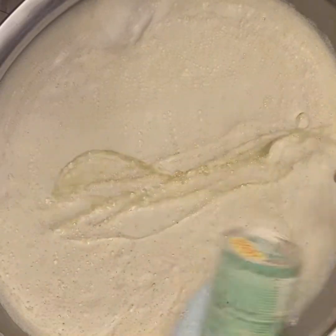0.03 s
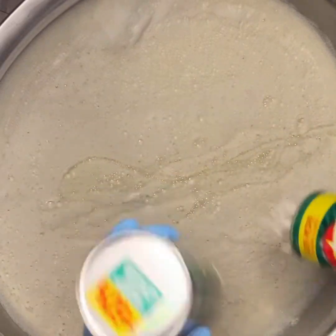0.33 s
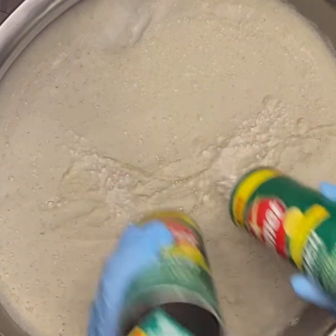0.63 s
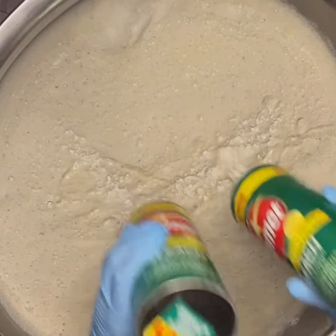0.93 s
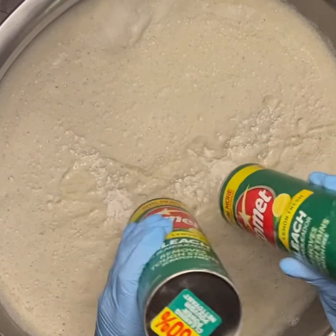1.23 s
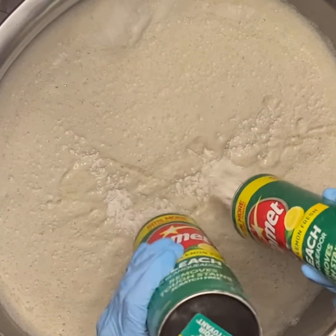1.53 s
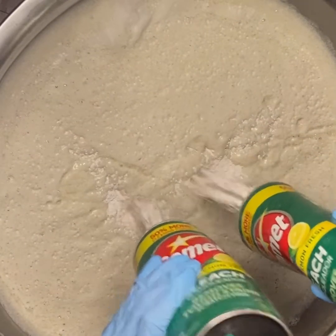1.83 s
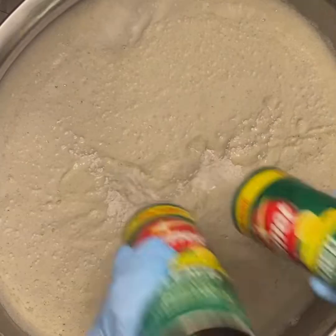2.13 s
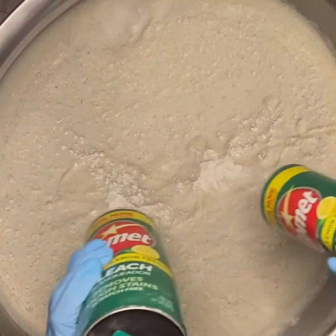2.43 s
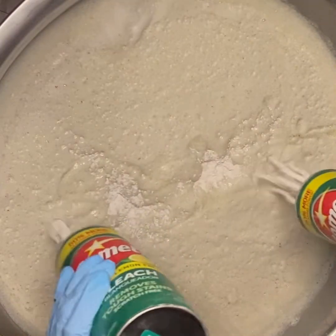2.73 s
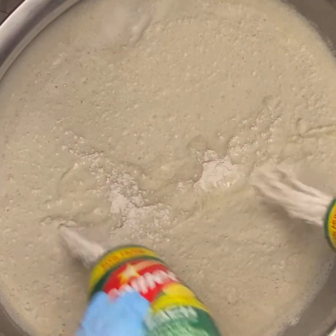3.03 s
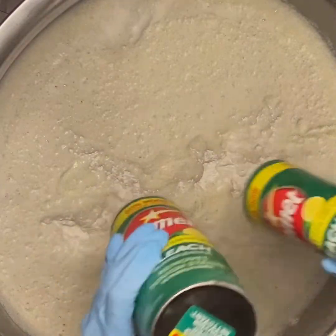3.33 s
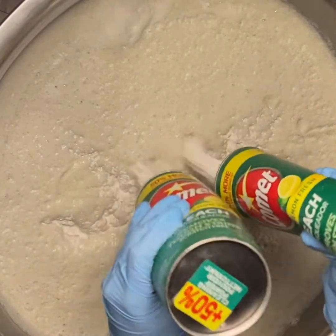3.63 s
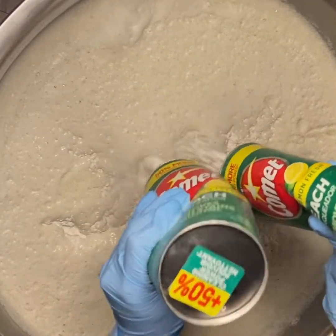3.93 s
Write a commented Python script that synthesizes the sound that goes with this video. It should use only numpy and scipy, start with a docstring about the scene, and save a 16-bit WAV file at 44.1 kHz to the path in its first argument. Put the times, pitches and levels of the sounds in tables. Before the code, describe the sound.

Foam fizzes and hisses as powder is shaken on, with a few canister clicks.

```python
"""Scouring powder pours from two canisters onto foam in a steel basin, hissing and fizzing close by.
Countless tiny bubbles and grains add up to broadband noise; small lumps excite the basin's resonances
and larger clumps land with a soft rush. Impacts set the canisters into damped free vibration: one hard
clack, sharp ticks of the rims and hollow taps on the cardboard tubes.
A machine rumbles and hums underneath, and a small, hard room adds brief reverberation."""
import sys
import numpy as np
from scipy import signal
from scipy.fft import rfft, irfft
from scipy.io import wavfile
from scipy.ndimage import uniform_filter1d

SR = 44100
rng = np.random.default_rng(int(sys.argv[2]) if len(sys.argv) > 2 else 0)


def generate_wav(sig):
    """Save sig (samples, or channels by samples) to the path in sys.argv[1] as 16-bit PCM at SR."""
    pcm = np.round(np.clip(np.atleast_2d(sig).T, -1, 1) * 32767).astype(np.int16)
    wavfile.write(sys.argv[1], SR, pcm)


N = 176400
T = np.arange(N) / SR

# Hiss levels over time: the pour, with a brief duck after the clack.
# Each row: time in seconds, relative levels of low, middle and treble hiss in dB.
HISS_LEVELS = [(0.0,-62,-59,-59.5),(0.19,-59,-65.5,-72),(0.27,-60,-53.5,-62),(0.312,-56,-57,-62),(0.37,-50.5,-59,-54),(0.5,-53.5,-51,-54),(0.92,-53,-51.5,-56.5),(1.14,-56.5,-55.5,-57),(1.36,-58,-53.5,-55.5),(1.55,-51,-52,-57.5),(1.85,-52,-52,-58.5),(2.08,-53,-52,-56.5),(2.27,-59,-52.5,-58),(2.46,-53.5,-50,-58),(2.7,-49,-47.5,-55.5),(3.1,-45,-47,-53),(3.42,-54,-48.5,-57.5),(3.6,-48,-49,-57),(3.78,-51,-48.5,-54.5),(4.0,-47,-51,-58.5)]
# Spectra of the three hiss bands. Each row: frequency in Hz, relative level in dB.
LOW_HISS_SPECTRUM = [(250, -12), (550, 4), (800, -1.5), (1100, -2), (1750, -4), (2600, -7), (4500, -39)]
MIDDLE_HISS_SPECTRUM = [(900, -25), (1700, -6), (2400, 1), (3500, 0), (5400, 0), (7000, -1), (8500, -2),
                        (10500, -10), (13000, -30)]
TREBLE_HISS_SPECTRUM = [(4500, -20), (7000, -3), (8200, 1.5), (9500, 1), (10800, -.5), (12000, -3.5),
                        (13500, -7), (15000, -11), (15700, -14), (16500, -28)]
# Resonances of the basin's hollow. Each row: frequency in Hz, bandwidth in Hz, relative level in dB.
BASIN_RESONANCES = [(171, 43, 8), (430, 77, 4.5), (620, 130, 0), (790, 76, 0), (1440, 180, -8),
                    (2170, 230, -4.5), (2700, 250, -5.5)]
# Two filters in series that shape the rumble. Each row: frequency in Hz, relative gain in dB.
RUMBLE_SPECTRUM = [(12, -30), (20, -11.5), (48, -2.5), (70, 4), (124, -4.5), (147, -9), (189, -5.5),
                   (252, -11.5), (290, -11.5), (330, -16.5), (392, -6.5), (478, -20), (600, -19),
                   (780, -39.5), (1320, -120)]
RUMBLE_SLOPE = [(20, -1), (60, -2), (550, -3.5), (900, 6.5), (1500, -28), (4000, -63)]
# Partials of the machine's hum. Each row: frequency in Hz, rms level in dB.
HUM_PARTIALS = [(59.5, -52), (75, -51.5), (119, -52), (197, -55.5), (294, -56.5), (389, -61.5)]
# Modes of a canister struck hard and of its tube tapped softly.
# Each row: frequency in Hz, relative level in dB, time to decay by 60 dB in seconds.
CANISTER_MODES = [(407, -37, 0.12), (805, -26, 0.03), (1295, -42, 0.028), (1630, -43, 0.0069),
                  (2270, -39, 0.022), (2488, -19, 0.027), (3450, -23.5, 0.0097), (4150, -28.5, 0.012),
                  (5400, -17.5, 0.011), (5520, -7.5, 0.0047), (7500, -11, 0.0063), (8700, -16.5, 0.0088),
                  (10860, -27, 0.0083)]
TUBE_MODES = [(800, -26.5, 0.024), (1195, -22, 0.013), (1440, -22.5, 0.0076), (1950, -22, 0.006),
              (2500, -13, 0.0056)]
# Spectra of the clack's contact and the powder inside. Each row: frequency in Hz, relative level in dB.
CRACK_SPECTRUM = [(200, -18), (700, -4), (1000, -15), (1400, 6), (1850, -11), (2500, -1), (4600, -3),
                  (5800, 3.5), (8500, 2), (12000, -14), (16000, -20)]
RATTLE_SPECTRUM = [(400, -6), (1500, -3), (2400, 3), (4500, 5.5), (8000, 6), (11000, 0), (13500, -21),
                   (16000, -36)]
# Rim impacts. Each row: start in seconds, gain in dB, ring frequency in Hz, body re click in dB.
RIM_TICKS = [(0.056, -12, 9400, -22), (1.2447, -28, 11000, -12), (1.2818, -21, 8000, -2),
             (1.2848, -9, 7600, 5.5), (1.289, -14, 12300, -23), (1.3531, -23.5, 11500, -20),
             (1.4074, -15.5, 10200, -20), (1.4157, -19.5, 6800, -20), (1.4487, -24, 12000, -20),
             (1.4906, -15.5, 9100, -19), (1.6603, 11.5, 10620, -23), (3.8561, -14.5, 10500, 4.5)]
# Spectra of a tick's click and the duller body under it. Each row: frequency in Hz, relative level in dB.
CLICK_SPECTRUM = [(200, -33), (1000, -23), (2500, -6.5), (3800, -5), (5100, 1), (6500, -6.5), (7800, 0),
                  (9000, -2.5), (10700, -5), (12200, -7), (13200, -16.5), (14500, -6), (16000, -29.5)]
BODY_SPECTRUM = [(300, -9), (900, -12), (1300, 0), (1800, -1), (2700, 6), (4500, 11), (7000, -20),
                 (14000, -44)]
# Taps on the tubes. Each row: start in seconds, gain in dB, cutoff of the contact in Hz.
TUBE_TAPS = [(0.0787, -2, 3200), (0.0828, -19, 895), (3.8565, 0, 1290)]
# Clumps landing. Each row: start in seconds, gain in dB, decay time constant in seconds, cutoff in Hz.
CLUMP_LANDINGS = [(0.318, -38.5, 0.076, 11000), (0.359, -40.5, 0.055, 7000), (0.805, -28.5, 0.0054, 4000),
                  (1.036, -35, 0.025, 8000), (1.769, -40.5, 0.65, 1810), (2.132, -32.5, 0.03, 2000),
                  (3.586, -32.5, 0.068, 1500), (3.89, -38.5, 0.091, 2480)]
# Spectrum of a clump's rush. Each row: frequency in Hz, relative level in dB.
CLUMP_SPECTRUM = [(300, 1.5), (900, -2.5), (2500, 3.5), (5500, 1.5), (8000, 4), (11000, 1), (14000, -1),
                  (16000, -30)]
# Filter for the stereo side signal. Each row: frequency in Hz, gain in dB.
SIDE_RESPONSE = [(30, -72), (100, -32), (350, -17), (700, -7.5), (1300, -6.5), (2400, -20.5), (5000, -13),
                 (8000, -74), (10000, -19), (15000, -20)]
# Phase lag of the left channel. Each row: frequency in Hz, lag in radians.
LEFT_PHASE_LAG = [(0, 0), (4900, .15), (5340, 1.0), (5860, 1.6), (6400, 2.1), (6900, 2.55), (7450, 3.08),
                  (8550, 3.2), (9100, 3.8), (10000, 4.4), (11000, 5.1), (11900, 6.1), (14200, 6.3),
                  (14700, 6.8), (15600, 9.1)]


def undb(db):
    """Amplitude ratio for a level in decibels."""
    return 10 ** (np.asarray(db) / 20)


def unit(x):
    """Normalisation to an rms of 1."""
    return x / np.sqrt(np.mean(x ** 2))


def noise():
    """Independent Gaussian samples have a white spectrum."""
    return rng.standard_normal(N)


def colour(x, points, keep_power=False, size=8192):
    """A minimum-phase filter through (Hz, dB) points, made causal by folding the cepstrum."""
    hz, db = np.array(points, float).T
    bins_hz = np.maximum(np.fft.rfftfreq(size, 1 / SR), 1)
    gain = undb(np.interp(np.log(bins_hz), np.log(hz), db))
    cepstrum = irfft(np.log(unit(gain) if keep_power else gain))
    cepstrum[1:size // 2] *= 2
    cepstrum[size // 2 + 1:] = 0
    response = irfft(np.exp(rfft(cepstrum)))[:size // 2]
    return signal.oaconvolve(x, response)[:N]


def wander(rate_hz):
    """Random steps, averaged twice, give a smooth fluctuation with an rms of 1."""
    hold = int(SR / rate_hz)
    steps = noise()[np.arange(N) // hold]
    return unit(uniform_filter1d(uniform_filter1d(steps, hold), hold))


def add(out, start_s, x):
    """Superposition of a sound from a given time onward."""
    i = int(start_s * SR)
    out[i:i + len(x)] += x[:N - i]


def random_impulses(per_s, cap_db, spread_db=4.5):
    """A Poisson process: independent events, here with exponentially distributed levels in dB."""
    occurs = rng.random(N) < per_s / SR
    return occurs * undb(np.minimum(spread_db * rng.exponential(size=N), cap_db))


def fizz(pop_power_share=.21, flicker_db=.4):
    """Shot noise from tiny bubbles and grains joins a smooth hiss in three bands of varying level."""
    times, low_db, middle_db, treble_db = np.array(HISS_LEVELS).T
    bands = [(LOW_HISS_SPECTRUM, low_db), (MIDDLE_HISS_SPECTRUM, middle_db + 3.5),
             (TREBLE_HISS_SPECTRUM, treble_db + 5)]
    pops, out = unit(random_impulses(per_s=5000, cap_db=27)), np.zeros(N)
    for spectrum, band_db in bands:
        grains = np.sqrt(pop_power_share) * pops * np.sign(noise())
        hiss = np.sqrt(1 - pop_power_share) * noise()
        level_db = np.interp(T, times, band_db) + flicker_db * wander(25.08)
        out += unit(colour(grains + hiss, spectrum)) * undb(level_db)
    return out


def lump_patter(grain_decay_s=.003):
    """Small lumps fall at random on the foam and drive the basin's hollow into resonance."""
    times, low_db, _, _ = np.array(HISS_LEVELS).T
    lumps = random_impulses(per_s=110, cap_db=13.5)
    patter = noise() * signal.lfilter([1], [1, -np.exp(-1 / (grain_decay_s * SR))], lumps)
    hollow = sum(undb(db) * signal.lfilter(*signal.iirpeak(hz, hz / bandwidth, fs=SR), patter)
                 for hz, bandwidth, db in BASIN_RESONANCES)
    return unit(hollow) * undb(np.interp(T, times, low_db) - .5)


def machine(rise_db_per_s=1.07, waver_db=2, relative_drift=.0079):
    """A continuous spectrum, the slowly swelling rumble, lies under a line spectrum, the wavering hum."""
    rumble = unit(colour(colour(noise(), RUMBLE_SPECTRUM), RUMBLE_SLOPE))
    out = rumble * undb(-40 + rise_db_per_s * T)
    for hz, db in HUM_PARTIALS:
        amplitude = np.sqrt(2) * undb(db) * unit(undb(waver_db * wander(8)))
        frequency = hz * (1 + relative_drift * wander(10))
        out += amplitude * np.sin(2 * np.pi * np.cumsum(frequency) / SR)
    return out


def strike(modes, contact_hz, t):
    """An impact excites damped modes; the contact acts as a low-pass filter, duller when softer."""
    ring = sum(undb(db) * np.sin(2 * np.pi * hz * t) * undb(-60 * t / t60) for hz, db, t60 in modes)
    return signal.lfilter(*signal.butter(2, contact_hz, fs=SR), ring)


def canister_clack(start_s=.0477, gain_db=3):
    """A hard impact is broadband: it cracks, rings the canister's modes and rattles the powder inside."""
    t, out = T[:SR // 2], np.zeros(N)

    def burst(spectrum, db, decay_s):
        decaying = rng.standard_normal(len(t)) * np.exp(-t / decay_s)
        return undb(db) * colour(decaying, spectrum, keep_power=True)[:len(t)]
    crack = burst(CRACK_SPECTRUM, db=-14.5, decay_s=.0028)
    rattle = burst(RATTLE_SPECTRUM, db=-32, decay_s=.035)
    ring = strike(CANISTER_MODES, contact_hz=9500, t=t)
    add(out, start_s, undb(gain_db) * (ring + crack + rattle))
    return out


def rim_ticks(echo_s=.00112, echo_gain=.26, ring_q=3.07, ring_db=10.5):
    """Each click excites a damped rim resonance; reflection between close, hard walls repeats it."""
    echoes, out = np.zeros(SR // 10), np.zeros(N)
    for bounce in range(4):
        echoes[int(bounce * echo_s * SR)] = echo_gain ** bounce
    click = colour(echoes, CLICK_SPECTRUM, keep_power=True)
    body = colour(echoes, BODY_SPECTRUM, keep_power=True)
    for start, db, ring_hz, body_db in RIM_TICKS:
        contact = (click + undb(body_db) * body) / 2
        rim = signal.lfilter(*signal.iirpeak(ring_hz, ring_q, fs=SR), click)
        add(out, start, undb(db) * (contact + undb(ring_db) * rim))
    return out


def tube_taps():
    """Softer impacts set a hollow cardboard tube into heavily damped free vibration."""
    out = np.zeros(N)
    for start, db, contact_hz in TUBE_TAPS:
        add(out, start, undb(db) * strike(TUBE_MODES, contact_hz, T[:SR // 2]))
    return out


def clump_puffs(attack_s=.0015):
    """Each clump of powder lands as a noise transient with a fast rise and an exponential decay."""
    rush, out = unit(colour(noise(), CLUMP_SPECTRUM)), np.zeros(N)
    for start, db, decay_s, cutoff_hz in CLUMP_LANDINGS:
        dulled = signal.lfilter(*signal.butter(1, cutoff_hz, fs=SR), rush)
        age = np.maximum(T - start, 0)
        envelope = (1 - np.exp(-age / attack_s)) * np.exp(-age / decay_s)
        out += undb(db) * envelope * dulled
    return out


def reverberation(x, scatter_decay_s=.0015, t60_s=.19):
    """Dense reflections merge into decaying noise: early scatter in the basin, then the room's tail."""
    def reflections(envelope):
        return unit(noise() * envelope) / np.sqrt(N)  # unit energy
    decay = undb(-60 * T / t60_s)
    dull_tail = colour(reflections(decay), [(2800, .5), (5000, -11.5), (9000, -22.5), (15000, -35)])
    bright_tail = colour(reflections(decay),
                         [(2000, -3), (5000, -8), (8000, 8.5), (10000, -11), (12000, -10), (15000, -18)])
    scatter = reflections(np.exp(-T / scatter_decay_s))
    response = undb(-8.5) * (dull_tail + bright_tail) + undb(-11) * scatter
    return signal.fftconvolve(x, response)[:N]


def scene():
    """The sources superpose at the centre; uncorrelated fizz, machine noise and reflections add width."""
    knocks, ticks = canister_clack() + tube_taps(), rim_ticks()
    powder = fizz() + clump_puffs() + lump_patter()
    into_room = undb(.5) * knocks + undb(-1) * ticks + undb(-4) * powder
    mid = powder + machine() + knocks + ticks + reverberation(into_room)
    side = colour(fizz() + machine() + undb(4) * reverberation(into_room), SIDE_RESPONSE)
    return np.array([mid + side, mid - side])


def record(dry, cutoff_hz=16200):
    """A phase lag delays the left channel's treble; peaks clip at full scale and a low-pass follows."""
    lag = np.interp(np.fft.rfftfreq(2 * N, 1 / SR), *np.array(LEFT_PHASE_LAG).T)
    phase_shift = np.exp(-1j * np.outer([1, 0], lag))
    delayed = irfft(rfft(dry, 2 * N) * phase_shift)[:, :N]
    low_pass = signal.ellip(8, .2, 70, cutoff_hz, fs=SR, output="sos")
    return signal.sosfilt(low_pass, np.clip(delayed, -1, 1))


dry = scene()
out = record(dry)
generate_wav(out)
```